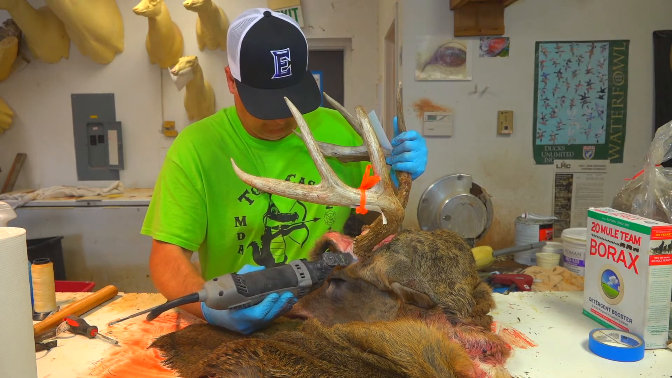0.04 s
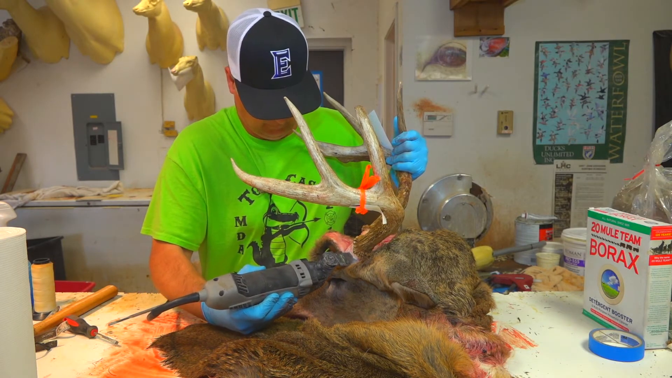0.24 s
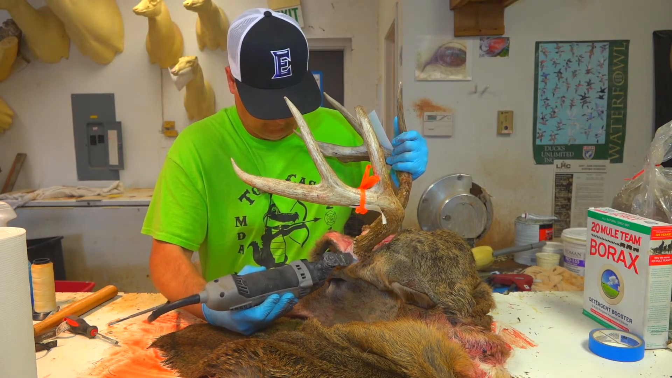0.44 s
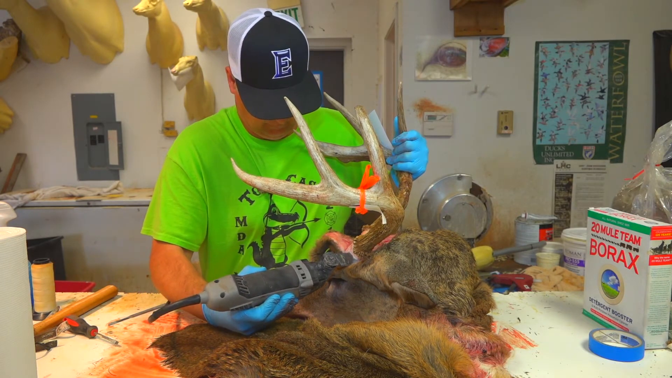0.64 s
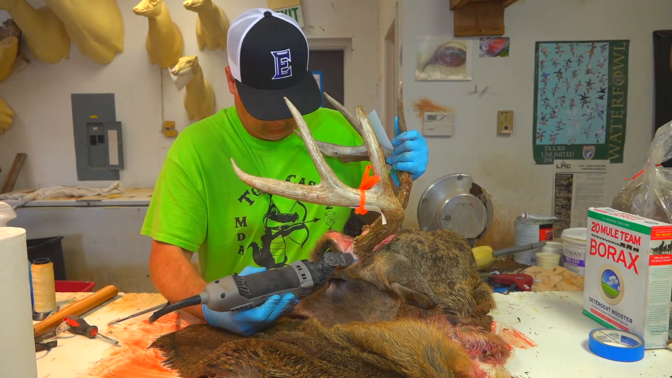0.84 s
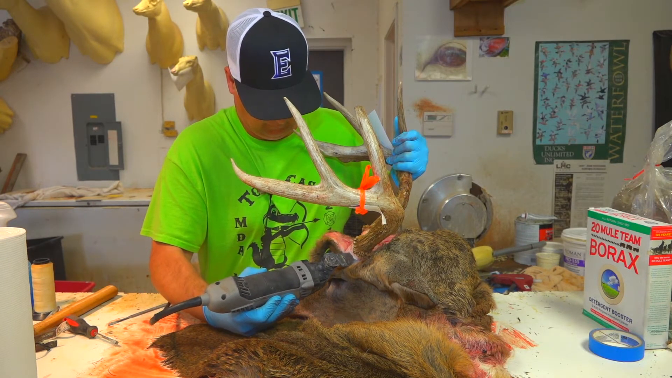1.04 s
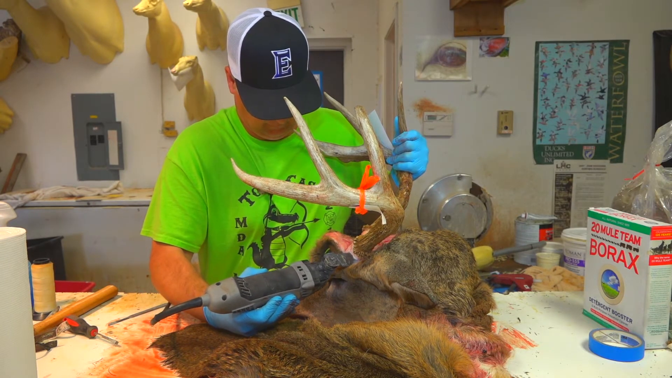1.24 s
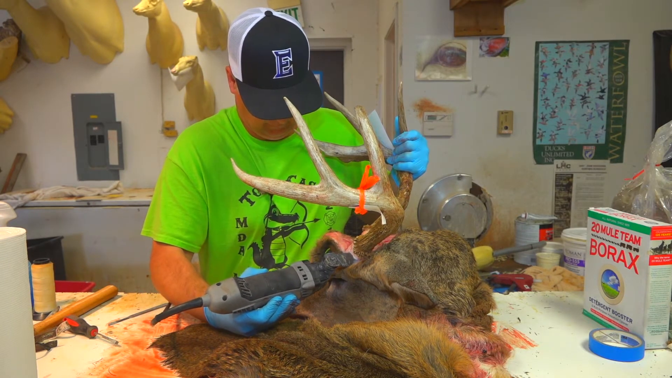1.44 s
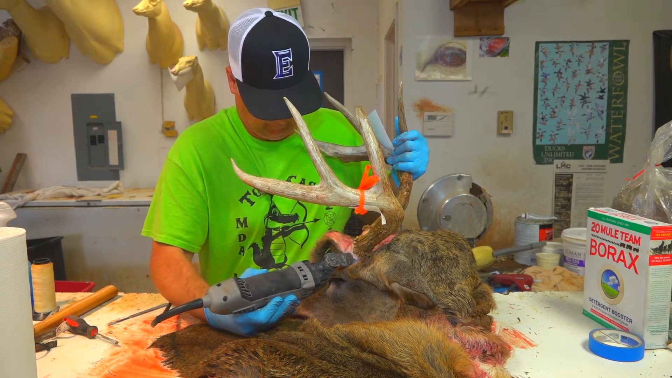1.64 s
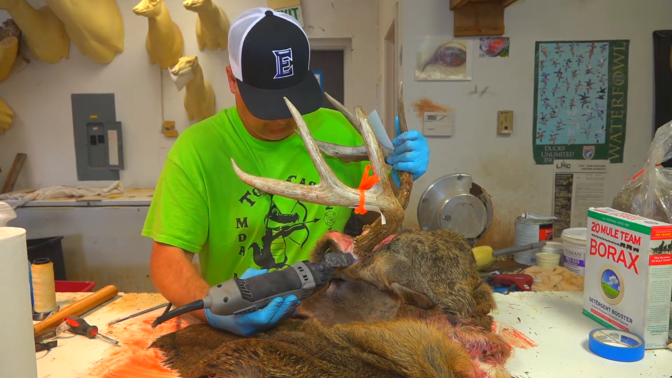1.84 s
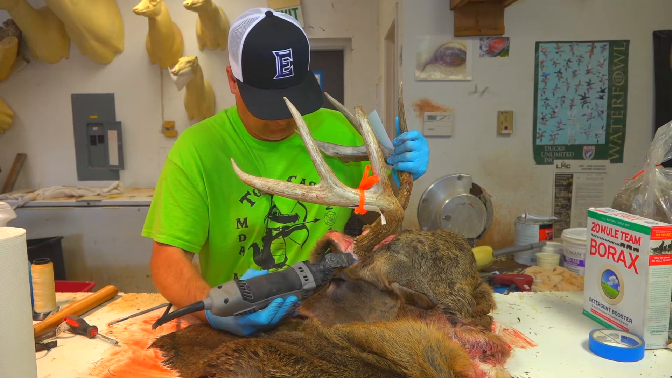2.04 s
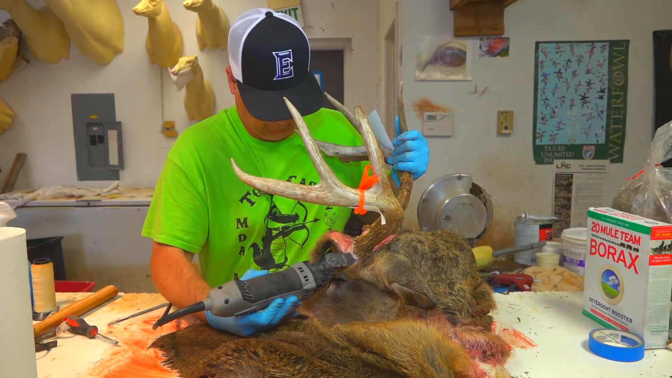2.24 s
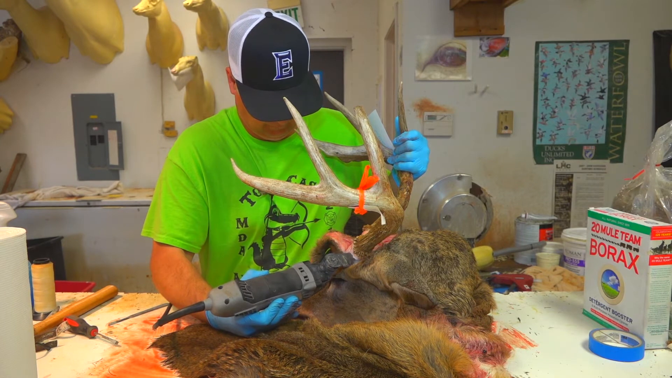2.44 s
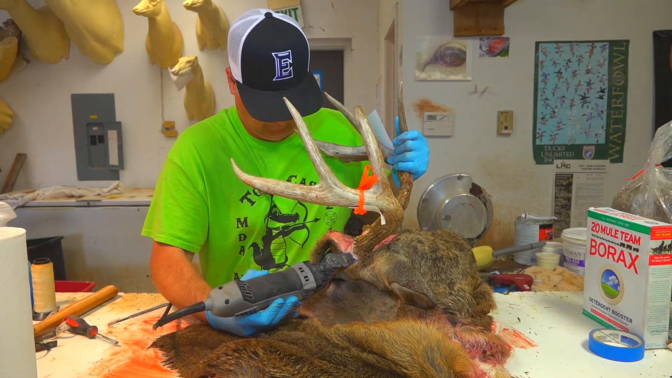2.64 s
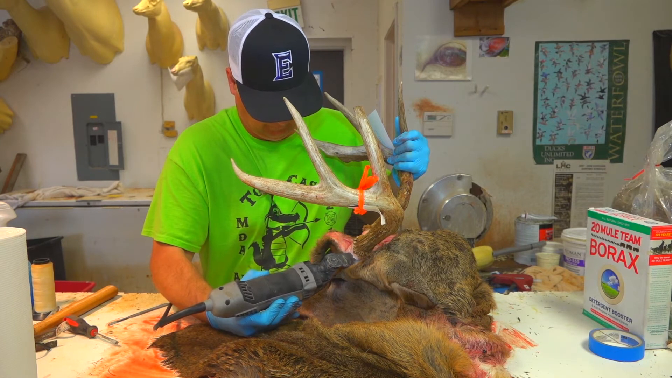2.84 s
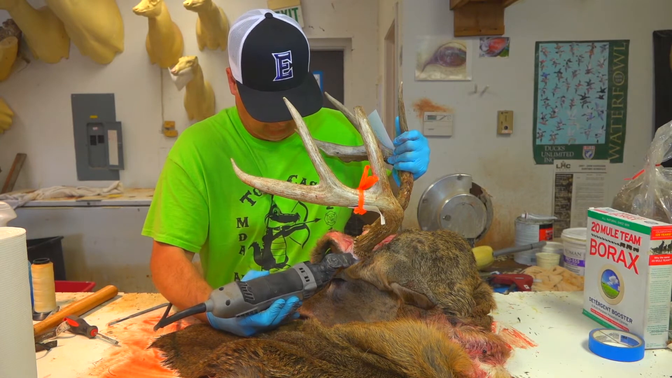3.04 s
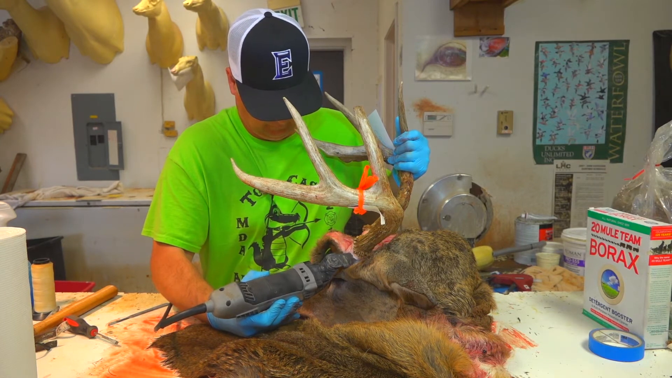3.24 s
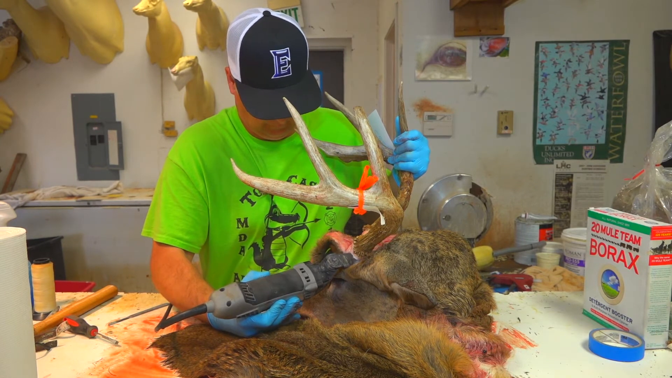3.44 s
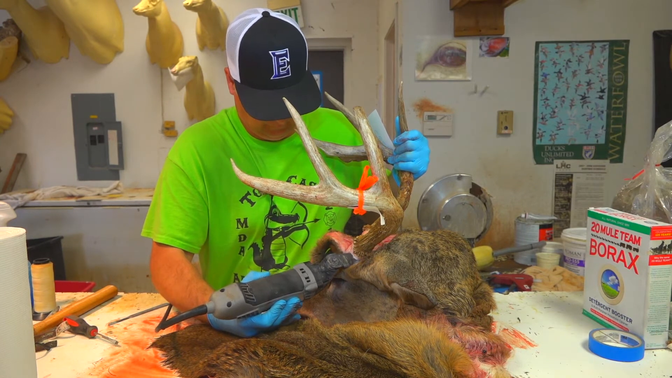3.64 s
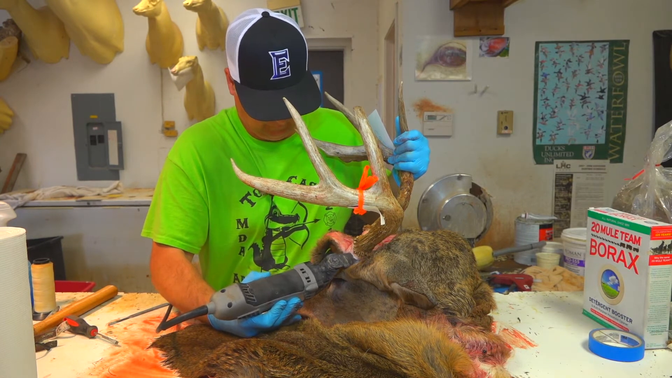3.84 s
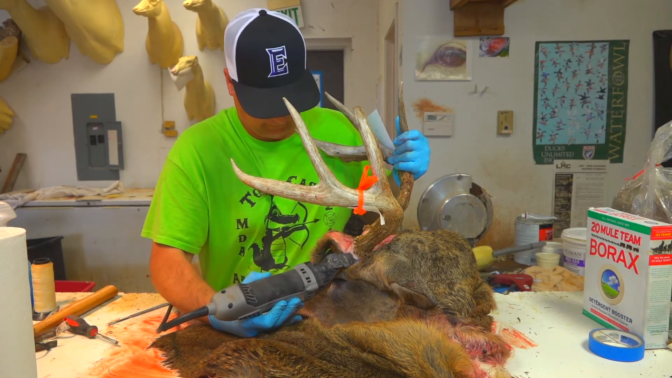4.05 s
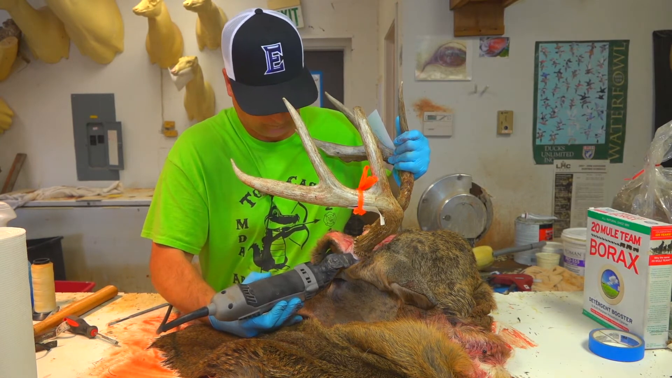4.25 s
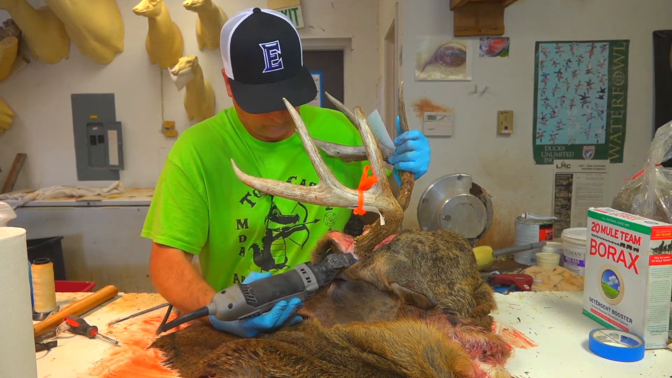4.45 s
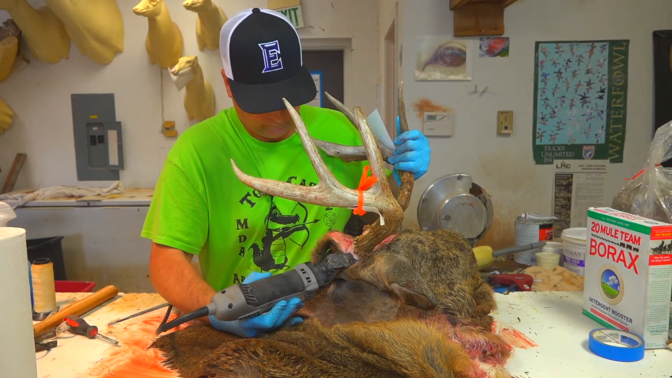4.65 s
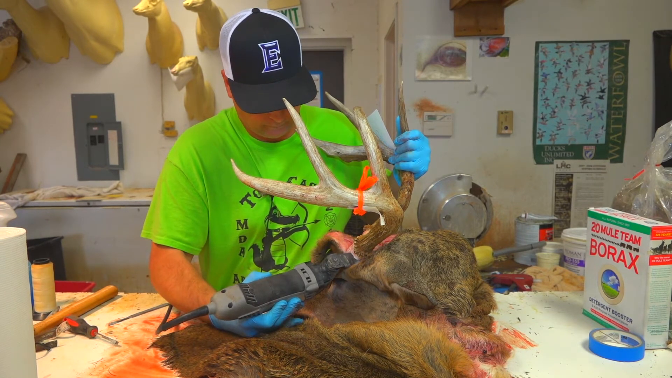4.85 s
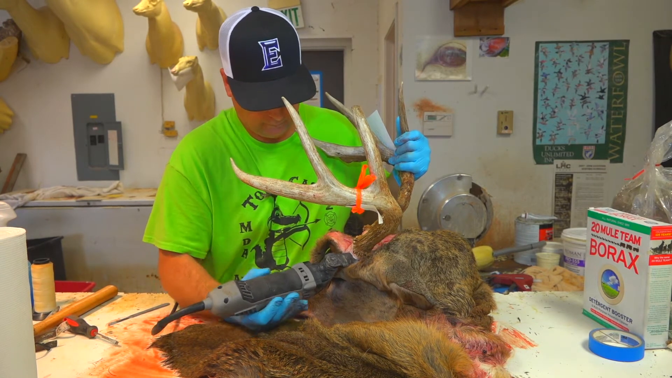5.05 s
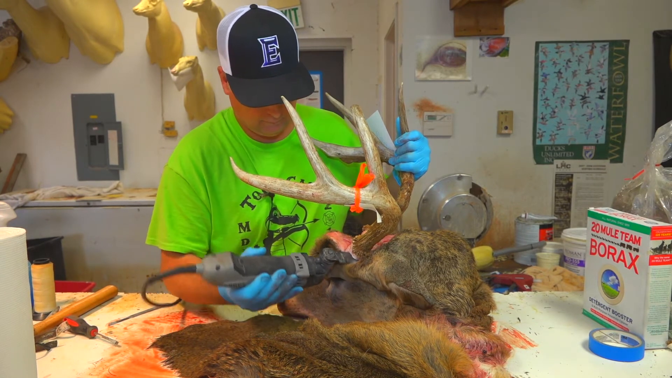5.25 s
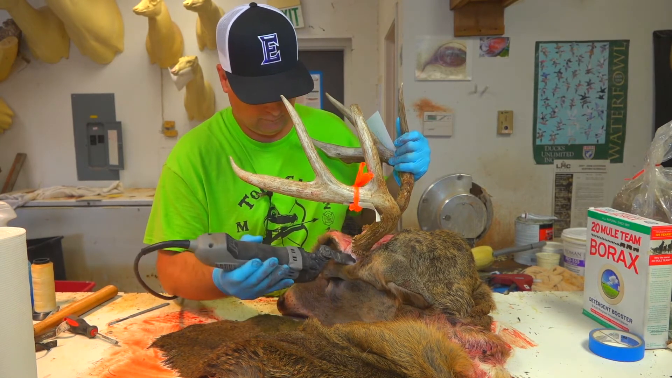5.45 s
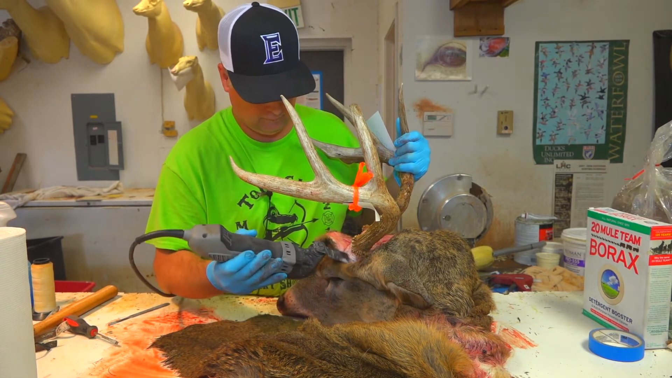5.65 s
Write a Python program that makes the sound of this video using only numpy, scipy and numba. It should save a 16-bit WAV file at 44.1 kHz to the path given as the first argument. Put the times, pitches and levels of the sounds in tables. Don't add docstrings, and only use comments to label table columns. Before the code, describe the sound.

Close, overloaded buzz of an electric saw cutting bone for five seconds, before the blade leaves the cut and the motor speeds up softly.

```python
import sys
import numpy as np
from scipy import signal
from scipy.fft import rfft, irfft, next_fast_len
from scipy.io import wavfile
from scipy.ndimage import map_coordinates
from numba import njit

SR = 44100
rng = np.random.default_rng(int(sys.argv[2]) if len(sys.argv) > 2 else 0)


def ratio_of_db(decibels):
    return 10 ** (np.asarray(decibels, float) / 20)


def wav_record(signal):
    frames = np.transpose(np.atleast_2d(signal))
    bounded = np.clip(frames, -1, 1)
    quanta = np.round(bounded * 32767).astype(np.int16)
    wavfile.write(sys.argv[1], SR, quanta)


N = 251370
STEP = 128


def unit(x):
    return x / np.sqrt(np.mean(x ** 2) + 1e-20)


def along(points, hz):
    f, v = np.transpose(points)
    return np.interp(np.log(hz + 1), np.log(f + 1), v)


def times(step=1):
    return np.arange(0, N + step, step)[:N] / SR


def curves(rows, step=1):
    s, *columns = np.transpose(rows)
    return [np.interp(times(step), s, column) for column in columns]


def wobble(rate, step=1):
    knots = rng.standard_normal(int(N * rate / SR) + 9)
    return map_coordinates(knots, [times(step) * rate])


def filtered(x, response):
    m = next_fast_len(N + 8192)
    return irfft(rfft(x, m) * response(np.fft.rfftfreq(m, 1 / SR)), m)[..., :N]


def noise(spectrum, shape=1):
    return unit(filtered(shape * rng.standard_normal(N), lambda hz: ratio_of_db(along(spectrum, hz))))


def modes_db(modes, hz, order=1):
    power = 0
    for centre, width, db in modes:
        offset = 2 * (hz - centre) / width
        power = power + ratio_of_db(db) ** 2 / (1 + (offset ** 2) ** order)
    return 10 * np.log10(power)


# start in seconds, duration in seconds.
ADVANCE = [
    (.7, 0.16),
    (1.3, 0.16),
    (1.8, 0.14),
    (2.7, .36),
    (3.9, 0.13),
    (4.55, 0.53),
    (5.03, .04),
    (5.16, 0.084),
    (5.39, .04),
    (5.56, .05),
]


def stage(step=1):
    return sum(curves([(s, 0), (s + takes, 1)], step)[0] for s, takes in ADVANCE)


def staged(rows):
    reached = stage()
    return [np.interp(reached, np.arange(len(rows)), column) for column in np.transpose(rows)]


# time in seconds, strokes a second in Hz.
RATE = [(0.0, 207), (0.6, 200.9), (0.95, 209.6), (1.27, 207.4), (1.68, 198.0), (1.84, 200.8), (3.45, 197),
        (3.49, 199.3), (3.75, 201.3), (4.09, 193.5), (4.24, 196.5), (4.48, 194.3), (4.9, 197.5),
        (5.05, 204.5), (5.21, 240.4), (5.32, 256.6), (5.59, 288), (5.7, 318)]
# middle in seconds, swing in Hz, duration in seconds.
SNAGS = [
    (.27, -1.13, 0.1),
    (2.24, 0.61, 0.042),
    (2.66, 1.43, .05),
    (3.421, 0.76, 0.032),
    (3.96, -.9, .025),
    (4.408, -0.99, 0.026),
]


def speed(step=1):
    rate_hz = curves(RATE, step)[0]
    for at, swing_hz, takes in SNAGS:
        x = (times(step) - at) / takes
        rate_hz = rate_hz + swing_hz * x * np.exp(0.5 - 0.5 * x ** 2)
    return rate_hz


@njit
def stack(first, weights, turn, step):
    out = np.zeros(len(turn))
    for n in range(len(turn)):
        j, part = n // step, n % step / step
        once, spin = np.exp(1j * turn[n]), np.exp(1j * first * turn[n])
        for k in range(weights.shape[1]):
            weight = weights[j, k] + part * (weights[j + 1, k] - weights[j, k])
            out[n] += (weight * spin).imag
            spin *= once
    return out


def partials(first, levels_db, turn, drift_db, slip, start):
    size = [ratio_of_db(db + drift_db * wobble(10, step=STEP)) for db in levels_db]
    angle = [slip * wobble(6, step=STEP) + at for at in start]
    weights = size * np.exp(1j * np.array(angle))
    return stack(float(first), weights.T.copy(), turn, STEP)


# centre in Hz, width in Hz, level in dB.
SURFACE = [(806, 450, -12), (1340, 390, -12.5), (1920, 440, -6), (2420, 210, -6), (3000, 210, -4.5),
           (3500, 470, -5.5), (3800, 110, -2.5), (4080, 160, -0.5), (4460, 330, -2.5), (5200, 240, -10),
           (5850, 640, -14), (6900, 250, -12.5)]
SHALLOW = [(780, 377, -7.5), (1250, 380, -10), (1710, 310, -5.5), (2110, 370, -7), (2542, 117, 2.5),
           (2830, 650, -3.5), (3920, 1150, -3), (4520, 260, -4), (5300, 820, -9.5), (5900, 150, -14),
           (6260, 410, -9), (6970, 310, -9.0), (7500, 130, -7.0)]
ROCKING = [(910, 640, -10.5), (1500, 500, -12.5), (2020, 200, -5.5), (2410, 170, -1.5), (3030, 300, -4),
           (3730, 530, -5.5), (4100, 180, -7), (4750, 540, -4.5), (5600, 270, -10), (6310, 890, -13.5)]
MIDDLE = [(840, 410, -9), (1185, 190, -8.5), (1820, 550, -9.5), (2455, 210, -1.5), (3146, 277, -0.5),
          (3684, 250, -2), (4180, 330, -4.5), (4560, 170, -4.5), (5080, 380, -5), (5680, 450, -7.5),
          (6200, 340, -10), (7050, 250, -24), (7500, 430, -10.5), (8300, 760, -12.5)]
DEEPER = [(850, 320, -9.5), (1130, 226, -8.5), (1760, 190, -9.5), (2316, 340, -2.5), (2788, 370, -5.5),
          (3165, 230, 1.5), (3620, 150, -6), (3950, 470, -6.5), (4380, 140, -5.5), (5040, 650, -9.5),
          (5610, 390, -8), (6265, 410, -5), (7740, 400, -13), (8400, 660, -9.5)]
DEEP = [(950, 460, -13.5), (1713, 116, -3.5), (2374, 365, -0.5), (3046, 263, 2), (3490, 240, -7.5),
        (3930, 190, -5), (4280, 190, -5.5), (4770, 340, -12), (5430, 1040, -11.5), (6470, 320, -5),
        (7080, 129, -12), (7500, 300, -10.5), (8200, 160, -11)]
LEAVING = [(900, 240, -14), (1740, 116, -4), (2060, 250, -5), (2440, 110, 1), (2920, 142, 2),
           (3260, 120, 0), (4350, 660, -4.5), (6400, 300, -13), (7040, 300, -9.5)]
HOUSING = [(803, 186, -4), (1250, 200, -22), (1780, 150, 4), (2070, 73, -8), (2590, 240, -2),
           (3320, 190, 4), (4250, 420, 2.5), (5300, 340, -7), (7150, 320, -2), (7460, 170, -5)]
BRUSHING = [(1070, 89, -11), (1420, 95, -11), (1657, 100, -5), (2250, 110, -4), (2510, 94, 3),
            (3390, 150, -6), (4170, 280, 1.5), (5870, 330, -8), (7220, 370, -7)]
AWAY = [(900, 180, -11), (1504, 170, -8), (2800, 150, -5), (3450, 200, -5), (4100, 380, 1), (5450, 400, -8),
        (7100, 400, -7)]
# centre in Hz, width in Hz, level in dB.
THIN_STEEL = [(7600, 1830, -21), (9960, 490, -22.5), (10260, 370, -28), (11500, 370, -22),
              (13360, 590, -38), (13300, 940, -25.5)]


def order_db(k):
    hz = k[:, None] * speed(STEP)
    by_stage = []
    for i, modes in enumerate((SURFACE, SHALLOW, ROCKING, MIDDLE, DEEPER, DEEP, DEEP)):
        bone_db = 1.113 * np.maximum(modes_db(modes, hz, order=2), -26)
        by_stage.append(np.maximum(bone_db, modes_db(THIN_STEEL, hz) + 0.86 * i))
    by_stage += [modes_db(modes, hz) for modes in (LEAVING, HOUSING, BRUSHING, AWAY)]
    depth = stage(STEP)
    level = sum(np.clip(1 - abs(depth - i), 0, 1) * db for i, db in enumerate(by_stage))
    return level - 10 * np.log10(np.sum(ratio_of_db(level) ** 2, axis=0) / 2)


def whole_strokes(blows):
    k = np.arange(4, 74)
    drift_db = 1.24 + 1.6 * (stage(STEP) > 6.5)
    chance = rng.uniform(0, 2 * np.pi, len(k))
    climbing = 0.43 * chance - np.pi * 0.08 * k ** 2
    start = np.where(k > 44, 0.48 * chance, climbing)
    return partials(k[0], order_db(k), blows, drift_db, slip=0.1, start=start)


# centre in Hz, width in Hz, level in dB.
BETWEEN = [(1050, 310, -11.5), (1760, 280, -7), (2473, 210, 2), (3010, 430, -3.5), (3800, 360, -0.5),
           (4450, 280, -2), (5000, 290, -8), (5480, 230, -15), (6300, 550, -9), (7240, 500, -10)]


def half_strokes(blows):
    k = np.arange(4, 38) + 0.5
    levels_db = modes_db(BETWEEN, k[:, None] * speed(STEP), order=2) - 9.5
    start = rng.uniform(0, 2 * np.pi, len(k))
    return partials(k[0], levels_db, blows, drift_db=4.0, slip=0.98, start=start)


def chatter(whole):
    return filtered(np.roll(whole, 70) * unit(wobble(420)), lambda hz: hz / (hz + 700))


# frequency in Hz, level in dB.
GRIT = [(300, -53), (900, -17), (2000, -6), (3500, -3.5), (5000, -5.5), (8000, -7.5), (11000, -18.5),
        (15500, -21.5)]


def grit(turn):
    swell_db = 2.5 * np.cos(turn) + 3.8 * np.cos(2 * turn + 1.3)
    return noise(GRIT, ratio_of_db(swell_db + 1.15 * wobble(12)))


# frequency in Hz, level in dB.
RUMBLE = [(25, -16), (45, -7), (80, -3), (125, -3), (170, -11), (300, -16), (500, -2), (800, -15),
          (1500, -23.5)]


def rumble(level_db):
    return ratio_of_db(level_db - 34.5 + 1.9 * wobble(5.3)) * noise(RUMBLE)


# middle in seconds, half length in seconds, roughness in dB.
JUDDERS = [
    (2.6, 0.062, -0.5),
    (3.31, 0.18, 2),
    (3.893, 0.099, 0),
    (4.947, 0.053, 1),
    (5.102, 0.092, 3),
    (5.434, .02, 3),
]


def judder_db():
    return sum(db / (1 + ((times() - at) / half) ** 6) for at, half, db in JUDDERS)


# half orders in dB, chatter in dB, grit in dB, rumble in dB.
BITE = [(-4.5, -6, -7.5, 6.5), (-4, -7, -7.5, 7), (-0.5, -7.5, -5.5, 5), (-8.5, -11.5, -7, -3),
        (-15.5, -13, -9.5, -2), (-13.5, -10.5, -11.5, -7), (-14, -13, -10, -7), (-18, -8, -7.5, 3),
        (-20, -6, -5, 6), (-23, -6, -7.5, 1), (-27, -7, -4.5, 5)]


def blade(turn):
    half_db, chatter_db, grit_db, rumble_db = staged(BITE) + judder_db()
    blows = turn + 0.058 * ratio_of_db(np.minimum(chatter_db, -9.5)) * unit(wobble(140))
    whole = whole_strokes(blows)
    cut = whole + ratio_of_db(half_db) * half_strokes(blows)
    cut = cut + ratio_of_db(chatter_db) * chatter(whole)
    return cut + ratio_of_db(grit_db) * grit(turn) + rumble(rumble_db)


# fundamental in dB, second order in dB, third order in dB, unsteadiness of the fundamental in dB.
SHAKE = [(-30, -35, -22.5, -2), (-29.5, -41, -24, 0), (-33.5, -30, -22.5, -3), (-40, -31.5, -23.5, 5.5),
         (-38.5, -28.5, -24.5, 9), (-44, -27, -22.5, 4), (-35, -37, -26, 5), (-40, -55, -36, 3),
         (-55, -62, -46, 2), (-55, -43, -51, -1), (-47, -61, -46.5, 3)]


def hum(turn):
    first_db, second_db, third_db, unsteady_db = staged(SHAKE)
    first_db = first_db + unsteady_db * np.tanh(wobble(9))
    out = 0
    for order, db in enumerate((first_db, second_db, third_db), start=1):
        level = ratio_of_db(db + 9.0 + 1.52 * wobble(11))
        out = out + level * np.sin(order * turn + 0.053 * wobble(12))
    return out


# frequency in Hz, level in dB.
SHOP = [(25, -20), (100, -16), (300, -12), (450, -2), (750, 4), (1200, 0), (2500, -10), (6000, -20)]


def drone():
    return ratio_of_db(-43.5 + 2.2 * wobble(10)) * noise(SHOP)


# frequency in Hz, level in dB.
FAR = [(60, -13), (200, -6), (600, 4), (1000, -3), (1500, 0), (2000, 7.5), (2700, -2), (3500, 1.5),
       (4800, 2), (6000, 5.5), (7500, 7), (10000, 2.5), (12000, -2), (15000, -27)]
# time in seconds, drop in dB.
FAR_LEVEL = [(0, 36.5), (1.5, 34.5), (2.5, 34.5), (3.5, 36.5), (4.7, 39.5), (5.05, 35), (5.2, 30),
             (5.7, 25)]


def far_microphone(cut, body, level_db):
    s = np.arange(SR // 10) / SR
    echoes = 0.12 * rng.standard_normal(len(s)) * ratio_of_db(-60 * s / 0.073)
    echoes[0] = 1
    heard = unit(signal.fftconvolve(cut + ratio_of_db(-level_db - 6.0) * body, echoes)[:N])
    diffuse = ratio_of_db(-3.0) * noise(GRIT) + ratio_of_db(-22) * noise(RUMBLE)
    far = unit(filtered(heard + diffuse, lambda hz: ratio_of_db(along(FAR, hz))))
    return ratio_of_db(level_db + 5.5 - curves(FAR_LEVEL)[0]) * np.roll(far, -92)


# time in seconds, level in dB.
EFFORT = [(0, -11.5), (1.15, -12.5), (1.7, -12), (2.65, -10.5), (4.08, -8.5), (4.75, -9.5), (4.98, -11.5),
          (5.035, -13.5), (5.075, -22), (5.15, -24), (5.2, -30), (5.4, -29.5), (5.5, -26.5), (5.58, -31.5),
          (5.7, -33)]


def scene():
    level_db = curves(EFFORT)[0]
    turn = 2 * np.pi * np.cumsum(speed() * (1 + 0.001 * wobble(40))) / SR
    hidden_db = np.maximum(level_db + 13.5, 0)
    cut, body = blade(turn), hum(turn)
    near = ratio_of_db(level_db + 5.0 + 0.76 * hidden_db) * cut + ratio_of_db(0.58 * hidden_db) * body + drone()
    return np.array([near, far_microphone(cut, body, level_db)])


def low_pass(x):
    return signal.sosfilt(signal.butter(12, 15750, fs=SR, output="sos"), x)


def record(dry):
    clipped = dry / (1 + abs(dry / 1.027) ** 8) ** (1 / 8)
    mix = filtered(clipped, lambda hz: (hz > 12) & (hz < 15730))
    return low_pass(mix)


dry = scene()
out = record(dry)
wav_record(out)
```